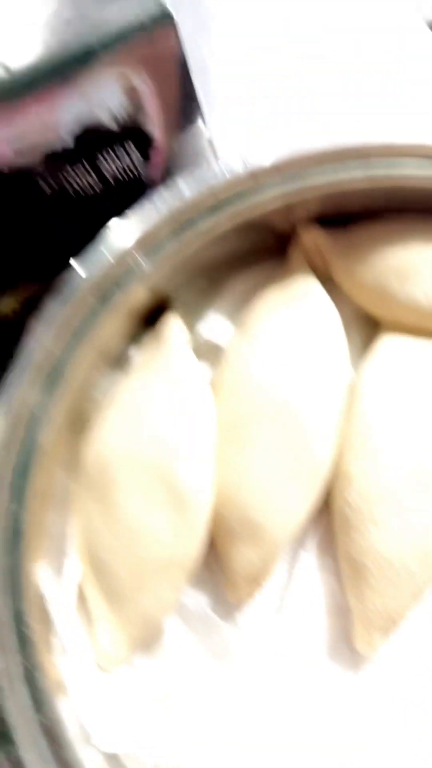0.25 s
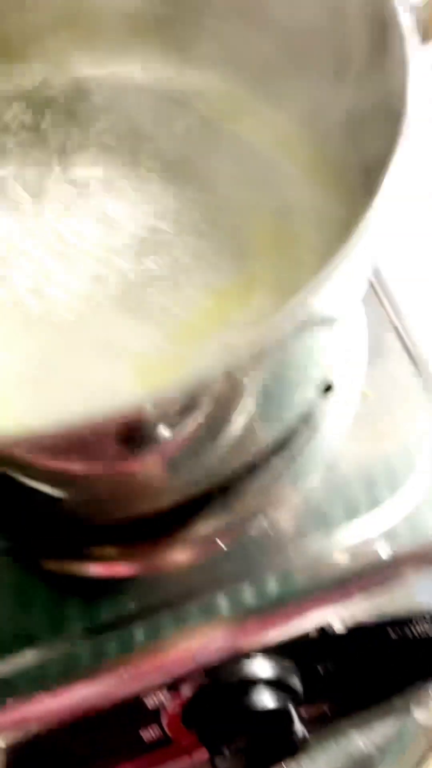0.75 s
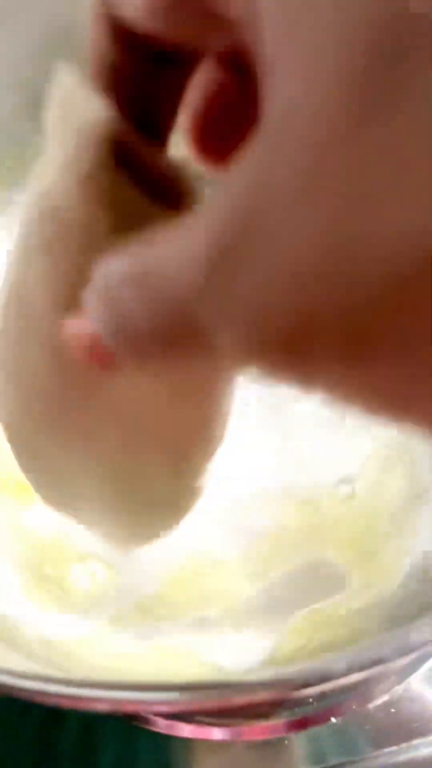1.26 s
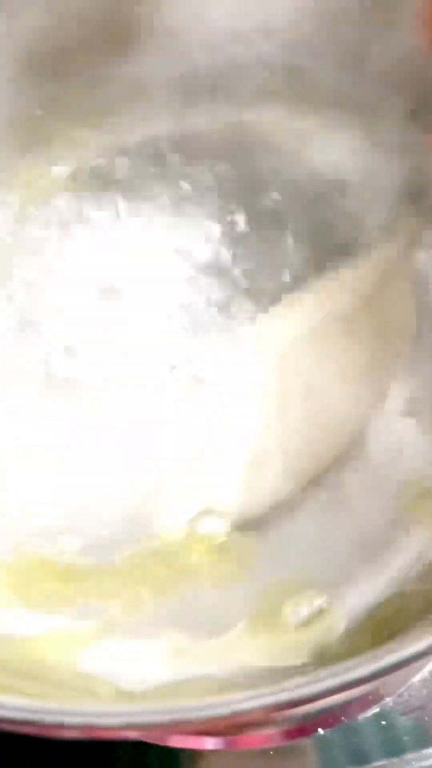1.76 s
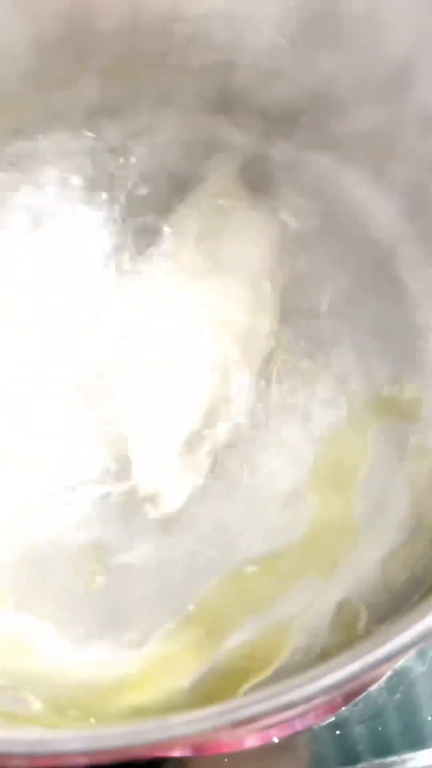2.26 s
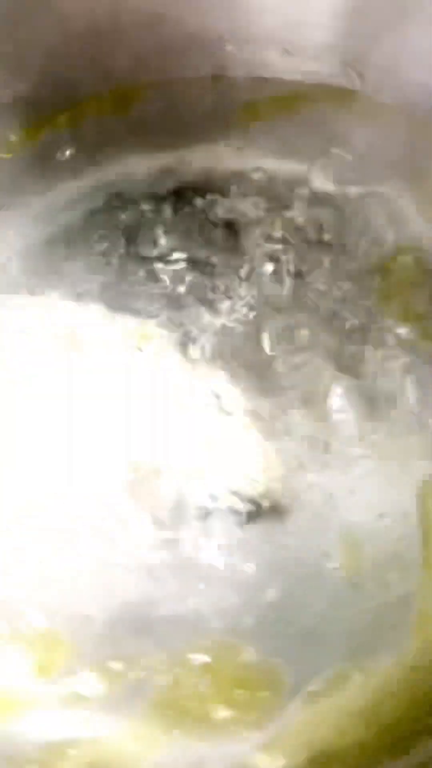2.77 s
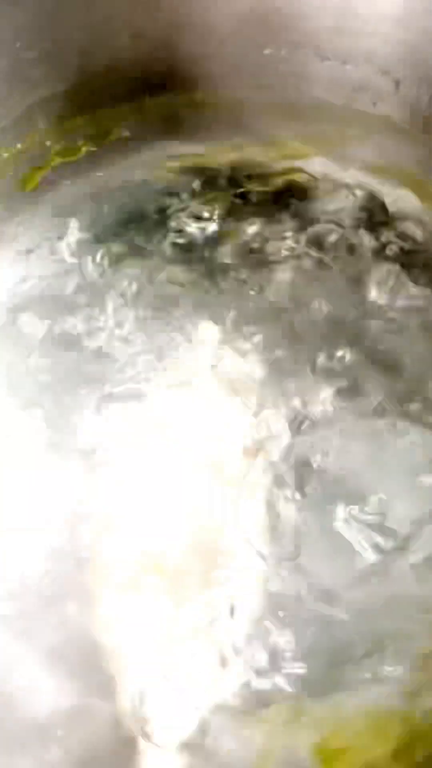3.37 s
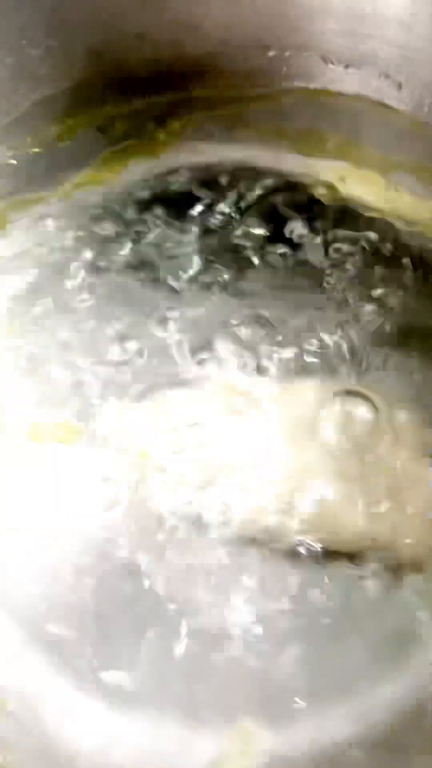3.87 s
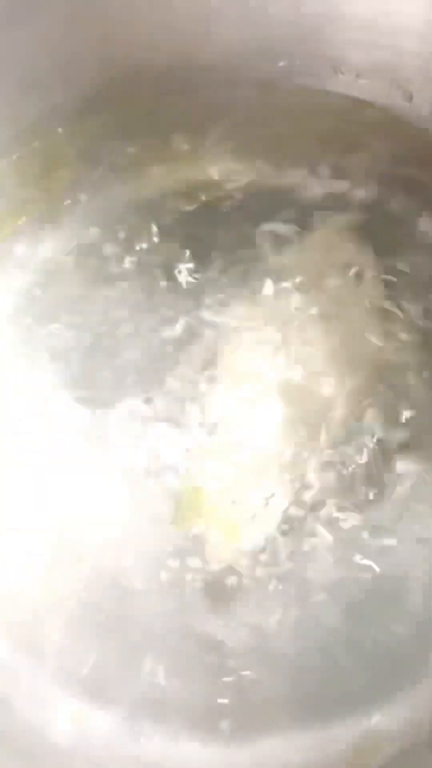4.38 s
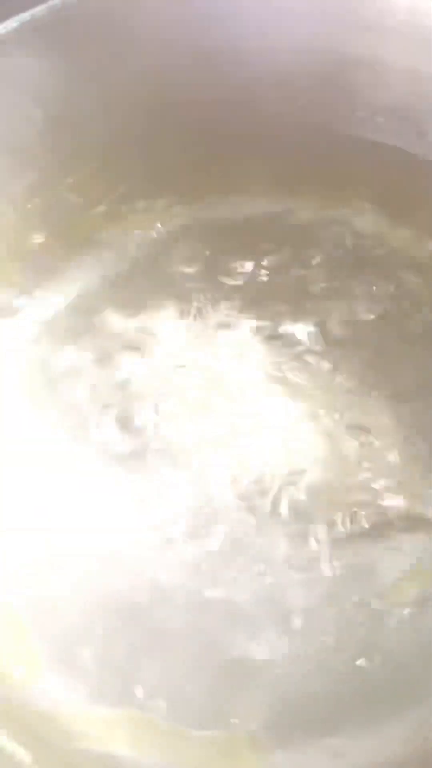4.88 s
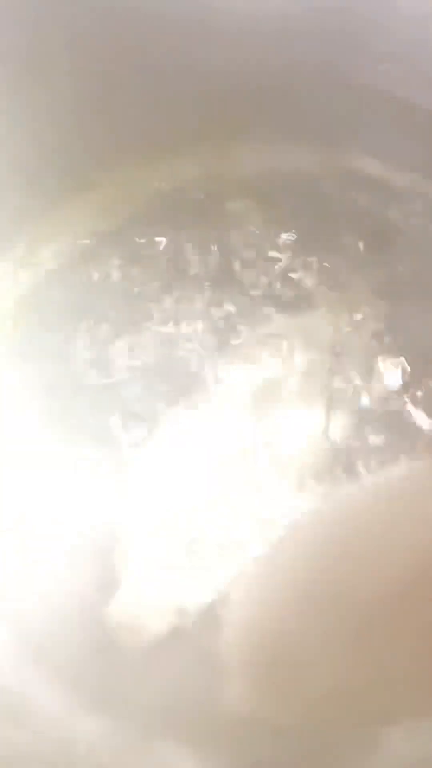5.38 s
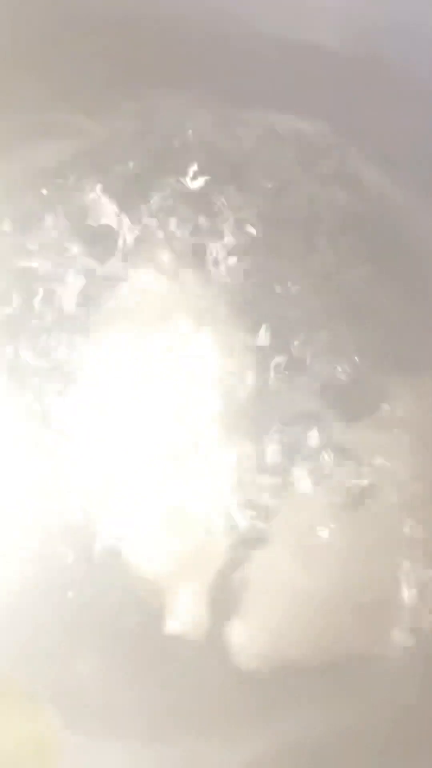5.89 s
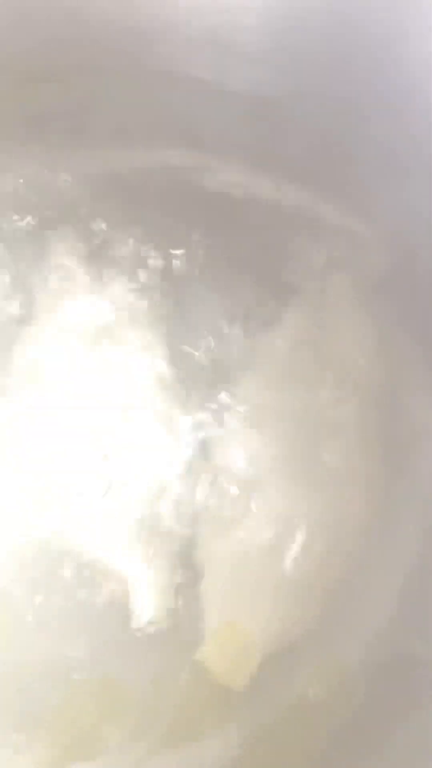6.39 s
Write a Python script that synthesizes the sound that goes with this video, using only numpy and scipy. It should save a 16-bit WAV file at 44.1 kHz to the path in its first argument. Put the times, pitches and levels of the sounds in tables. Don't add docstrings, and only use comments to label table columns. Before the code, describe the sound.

From 0 to about 6.6 seconds a low, bass-heavy machine drone runs without a break. An engine-like throb, strongest near 48 Hz, drifts slightly up and down, sagging toward 1.6 s, lifting around 2.2 s, dipping near 4.2 s and recovering; a steady motor just below it makes the hum beat unevenly. Room rumble and thin electrical hum lie underneath. A pot of water seethes softly in the low mids with countless tiny bubbles. Hollow, short plops around 450 Hz stand out at about 0.6, 1.4, 2.1, 2.3, 3.9, 4.25, 5.2, 5.6 and 6.4 s, with slightly higher blips between, as at 4.7 s. At 2.8 s a quick, faint cluster of rising bubbles breaks the surface. A very faint high motor whine bends with the moving handheld microphone, a little clearer near 4.7 s, over a smooth thin hiss.

```python
import sys
import numpy as np
from scipy import signal
from scipy.fft import irfft
from scipy.io import wavfile
from scipy.ndimage import uniform_filter1d, map_coordinates

SR = 44100
rng = np.random.default_rng(int(sys.argv[2]) if len(sys.argv) > 2 else 0)


def magnitude_from_level(level_db):
    exponent = np.asarray(level_db, float) / 20
    return 10 ** exponent


def wav_record(signal):
    frames = np.transpose(np.atleast_2d(signal))
    bounded = np.clip(frames, -1, 1)
    quanta = np.round(bounded * 32767).astype(np.int16)
    wavfile.write(sys.argv[1], SR, quanta)


N = 292568


def evened(x):
    return (x - x.mean()) / x.std()


def read(points, hz):
    f, db = np.transpose(points)
    return np.interp(np.log(hz + 1), np.log(f + 1), db, -200, -200)


def curve(rows):
    s, value = np.transpose(rows)
    return np.interp(np.arange(N) / SR, s, value)


def drift(count, hz):
    knots = rng.standard_normal((count, 64))
    s = np.arange(0, N / SR + .02, .01)
    return [np.interp(np.arange(N) / SR, s, map_coordinates(k, [s * hz], order=3)) for k in knots]


def tone(db, turns):
    return np.sqrt(2) * magnitude_from_level(db) * np.cos(2 * np.pi * turns)


def rising_note(hz, t, rise_per_s):
    return np.hanning(len(t)) * np.sin(2 * np.pi * hz * t * (1 + rise_per_s * t))


def wash(shape, size, patchy_db, flicker_db, bins, frames):
    overlap = size * 3 // 4
    hz, _, z = signal.stft(rng.standard_normal(N + size), SR, nperseg=size, noverlap=overlap)
    chance = rng.standard_normal(z.shape)
    patches = evened(uniform_filter1d(uniform_filter1d(chance, bins, 0), frames, 1))
    field_db = shape(hz)[:, None] + patchy_db * patches + flicker_db * evened(chance.sum(0))
    _, noise = signal.istft(z * magnitude_from_level(field_db), SR, nperseg=size, noverlap=overlap)
    return np.sqrt(SR / 2) * noise[:N]


# time in seconds, firing rate in Hz.
ENGINE_SPEED = [(0.4, 24.52), (0.8, 24.03), (1.2, 23.94), (1.6, 23.62), (1.8, 23.834), (2.2, 24.5),
                (2.4, 24.501), (2.6, 24.361), (3.0, 24.415), (3.4, 24.27), (4.2, 23.49), (4.8, 23.89),
                (5.5, 24.175), (5.8, 24.095), (6.2, 24.111), (6.4, 23.926)]
# multiple of firing rate, level in dB, gain over room modes in dB per Hz, polarity.
ENGINE_ORDERS = [(1, -51, 1, 1), (2, -36, -7, 1), (3, -46.5, 4.5, 1), (4, -44.2, -1, -1), (5, -49, -3.5, 1),
                 (6, -61, -2, 1)]
ENGINE_START = (.55, -.15)
# multiple of firing rate, level in dB.
PULLEY = (6.265, -55)


def engine():
    hz = curve(ENGINE_SPEED)
    turns = np.cumsum(hz) / SR
    angle, skew = ENGINE_START
    sway = drift(count=7, hz=2.38)
    pulse = np.zeros(N)
    for (k, db, db_per_hz, sign), s in zip(ENGINE_ORDERS, sway):
        level_db = db + db_per_hz * (hz - 24) + .5 * s
        pulse += sign * tone(level_db, k * (turns + angle) + skew)
    slip = sway[-1]
    ratio, wheel_db = PULLEY
    wheel = tone(wheel_db + 5 * (hz - 24) + 1.5 * slip, ratio * turns + .15 * slip)
    return pulse + wheel


# multiple of shaft rate, level in dB.
MOTOR_ORDERS = [(2, -52), (3, -47.6), (4, -48), (5, -57)]
# multiple of shaft rate, level in dB.
TEETH = [(20, -64.0), (24, -67.8), (51, -79.7), (63, -79.6), (100, -91.4), (136, -88.5), (139, -89.8),
         (140, -91.2), (144, -93.7), (150, -88.9), (151, -90.6), (155, -88.6), (156, -91.9), (161, -93.0),
         (162, -88.5), (163, -87.1), (164, -89.1), (165, -91.6), (166, -84.5), (167, -91.9), (168, -90.5),
         (171, -80.8), (172, -93.2), (177, -91.1), (182, -89.9), (183, -92.2), (186, -95.6), (288, -99.8),
         (297, -100.6), (329, -99.9)]
# frequency in Hz, typical level in dB.
RATTLE = [(2400, -118), (3000, -109), (3800, -101), (4500, -107), (5400, -108), (6200, -112), (8800, -110),
          (9800, -120)]
# time in seconds, speed towards the motor in m/s.
HAND = [(0.22, -.38), (0.36, -1.15), (0.8, .4), (1.1, .81), (1.58, .75), (1.78, -.09), (2.6, -.18),
        (3.2, .41), (3.5, .07), (4.0, .31), (4.4, .21), (5.2, -.09), (5.9, -.81), (6.1, -.74), (6.4, -.18)]
# time in seconds, gain in dB.
FACING = [(0.5, -2.5), (1.2, -.5), (2.0, -1), (3.6, -1), (4.7, 3), (6.6, 1.5)]


def motor():
    shaft_hz, start_turns, sound_m_per_s = 23.23, .17, 343
    turns = np.cumsum(shaft_hz * (1 + curve(HAND) / sound_m_per_s)) / SR
    low = -sum(tone(db, round(k) * (turns + start_turns)) for k, db in MOTOR_ORDERS)

    sway = drift(count=len(TEETH), hz=2.14)
    teeth = []
    for (k, db), s in zip(TEETH, sway):
        teeth.append(tone(db + 2.2 * s, round(k) * turns + rng.random() + .08 * s))
    whine = 4 + np.argmax([db for _, db in TEETH[4:]])
    teeth[whine] = teeth[whine] * magnitude_from_level(curve(FACING) - 1.6 * sway[whine])

    order = np.arange(1025)
    size = magnitude_from_level(read(RATTLE, order * shaft_hz)) * rng.rayleigh(1, 1025)
    size[[round(k) for k, _ in TEETH]] = 0
    one_turn = irfft(size * np.exp(2j * np.pi * rng.random(1025))) * 1024 * np.sqrt(2)
    rattle = map_coordinates(one_turn, [turns % 1 * 2048], order=3, mode="grid-wrap")
    return low + sum(teeth) + rattle


# frequency in Hz, level in dB.
HUM = [(100, -57.5), (1962, -81), (2400, -88), (2460, -91), (4800, -99), (5600, -104), (5854, -103)]


def hum():
    t = np.arange(N) / SR + .003
    sway = drift(count=len(HUM), hz=3)
    return sum(tone(db + 1.2 * s, hz * (t + 6e-5 * s)) for (hz, db), s in zip(HUM, sway))


# frequency in Hz, level in dB per Hz.
RUMBLE = [(1, -82), (30, -78), (42, -70), (57, -60), (66, -66.5), (85, -64), (106, -67.5), (128, -65),
          (140, -69.5), (150, -67), (163, -72.5), (178, -68.5), (222, -70), (242, -86)]


def rumble():
    return wash(lambda hz: read(RUMBLE, hz), size=16384, patchy_db=.8, flicker_db=.3, bins=8, frames=3)


# frequency in Hz, level in dB per Hz.
BOIL = [(190, -91.5), (240, -77.5), (330, -77), (450, -78.5), (520, -80), (640, -85), (900, -84.5),
        (1100, -89), (1150, -90), (1900, -95), (2700, -106), (3400, -108), (4500, -113), (6000, -130)]
# frequency in Hz, width in Hz, lift in dB.
POT = [(455, 88, 3.5), (745, 42, 7.5), (1036, 40, 6), (1285, 58, 3.5)]


def water_db(hz):
    return read(BOIL, hz) + sum(db / (1 + (2 * (hz - f) / w) ** 2) for f, w, db in POT)


def boil():
    bubbles_per_s, bubbles_db, pitches = 120, -61.5, 30
    seethe = wash(water_db, size=2048, patchy_db=1.0, flicker_db=0.25, bins=4, frames=4)
    notes = np.zeros(N)
    for hz in np.geomspace(300, 2400, num=pitches):
        t = np.arange(0, 16 / hz, 1 / SR)
        note = magnitude_from_level(water_db(hz)) * np.sqrt(hz) * rising_note(hz, t, rise_per_s=1.22)
        when, size = rng.random((2, N))
        starts = (when < bubbles_per_s / pitches / SR) * (0.17 + size)
        notes += signal.oaconvolve(starts, note)[:N]
    return seethe + magnitude_from_level(bubbles_db) * evened(notes)


# frequency in Hz, level in dB per Hz.
HISS = [(2700, -125), (3800, -108), (4300, -112), (5000, -115), (6100, -118), (7500, -118.5), (8700, -121),
        (10500, -127), (12400, -123), (14700, -123), (16000, -125)]


def hiss():
    return wash(lambda hz: read(HISS, hz), size=512, patchy_db=0.4, flicker_db=-1.2, bins=8, frames=16)


# start in seconds, peak in dB, pitch in Hz, length in seconds.
BLOOPS = [(.575, -43.5, 455, .085), (.57, -63, 1845, 0.066), (.58, -64, 1645, .05),
          (0.649, -54.5, 946, 0.051), (1.35, -44, 466, 0.028), (1.431, -47, 476, 0.026),
          (1.5, -54, 1002, .04), (2.07, -47, 475, 0.011), (2.309, -47, 426, 0.033), (2.82, -50, 893, .03),
          (2.946, -54, 940, .03), (3.287, -56, 753, 0.036), (3.922, -45.5, 448, .045),
          (4.164, -49.5, 746, 0.041), (4.25, -46, 457, 0.054), (4.677, -49.5, 757, 0.026),
          (5.16, -48, 491, 0.029), (5.263, -57.5, 1350, 0.067), (5.625, -48, 448, .04),
          (6.423, -47, 479, 0.049)]


def bloops():
    out = np.zeros(N)
    for s, db, hz, length_s in BLOOPS:
        t = np.arange(0, length_s, 1 / SR)
        wobble = 1 + 0.22 * evened(uniform_filter1d(rng.standard_normal(4096), 200))[:len(t)]
        swell = np.hanning(len(t)) ** 0.48
        ring = np.sin(2 * np.pi * hz * t * (1 + 0.092 * t))
        out[round(s * SR):][:len(t)] += magnitude_from_level(db) * wobble * swell * ring
    return out


# start in seconds, length in seconds, level in dB.
SPLASH = (2.785, .11, -59)


def splash():
    start_s, length_s, db = SPLASH
    low_hz, high_hz, cycles, count = 1250, 2300, 20, 12
    out = np.zeros(N)
    for k, (late, pitch, size) in enumerate(rng.random((count, 3))):
        when = (k + late) / count
        hz = low_hz * (high_hz / low_hz) ** pitch
        t = np.arange(0, cycles / hz, 1 / SR)
        level = magnitude_from_level(db) * np.sin(np.pi * when) ** .5 * (.5 + size)
        out[round((start_s + when * length_s) * SR):][:len(t)] += level * rising_note(hz, t, rise_per_s=1.5)
    return out


def scene():
    machines = engine() + motor() + hum()
    pot = boil() + hiss() + bloops() + splash()
    return (machines + rumble() + pot)[None]


def band_limit(x):
    return signal.sosfilt(signal.butter(12, 15750, fs=SR, output="sos"), x)


def record(dry):
    return band_limit(dry)


dry = scene()
out = record(dry)
wav_record(out)
```